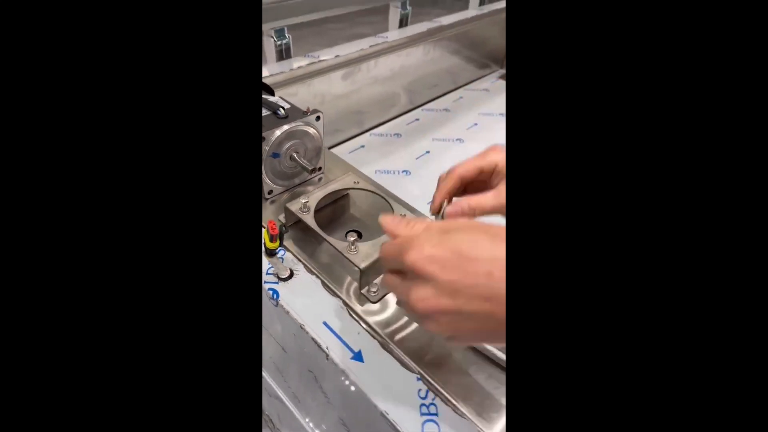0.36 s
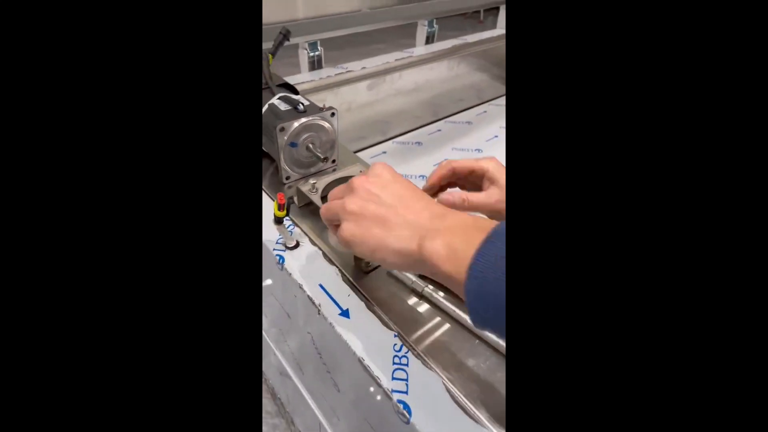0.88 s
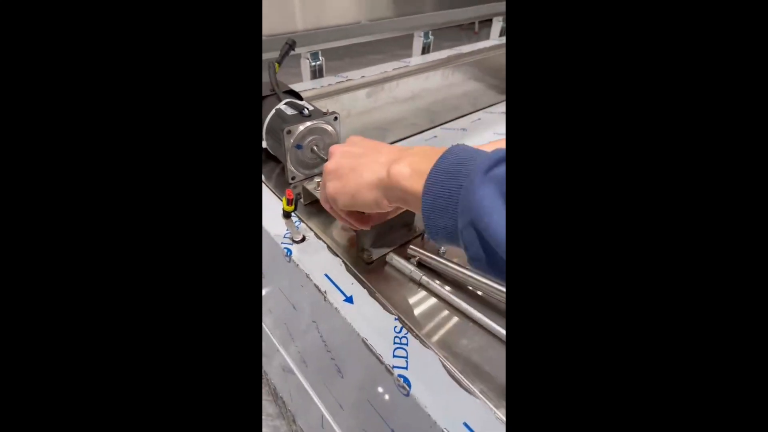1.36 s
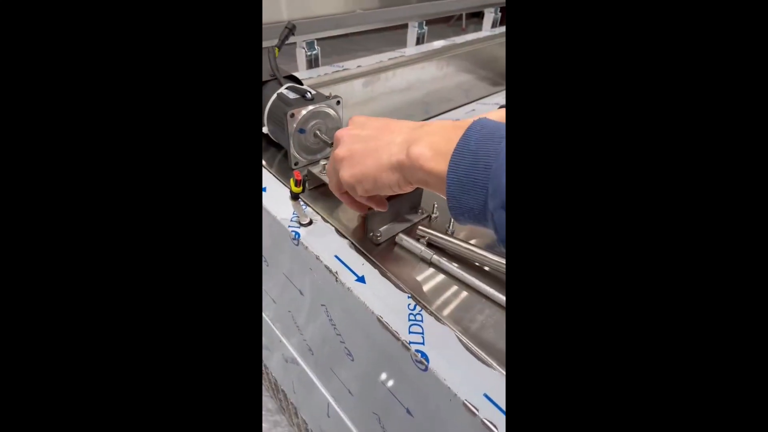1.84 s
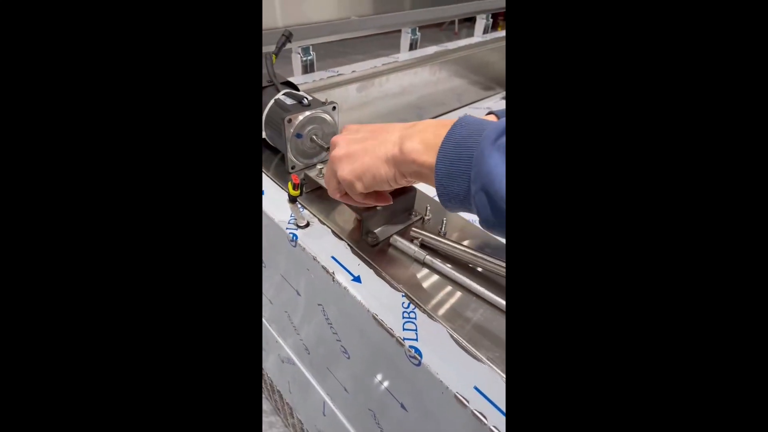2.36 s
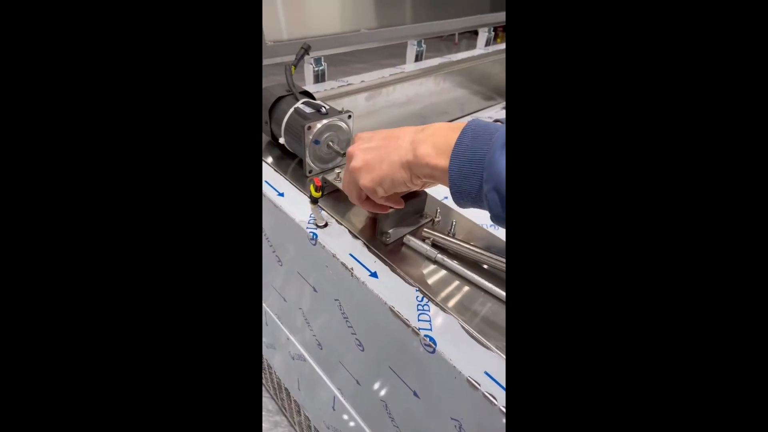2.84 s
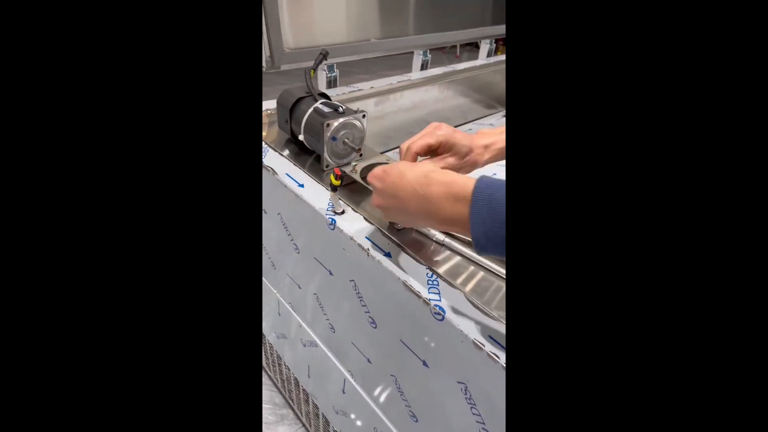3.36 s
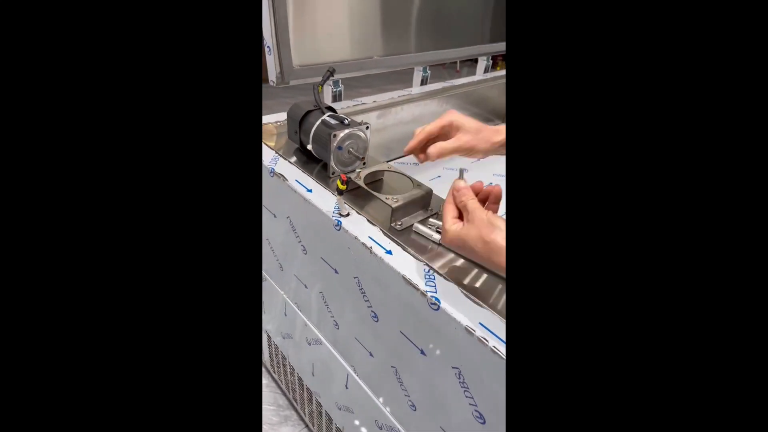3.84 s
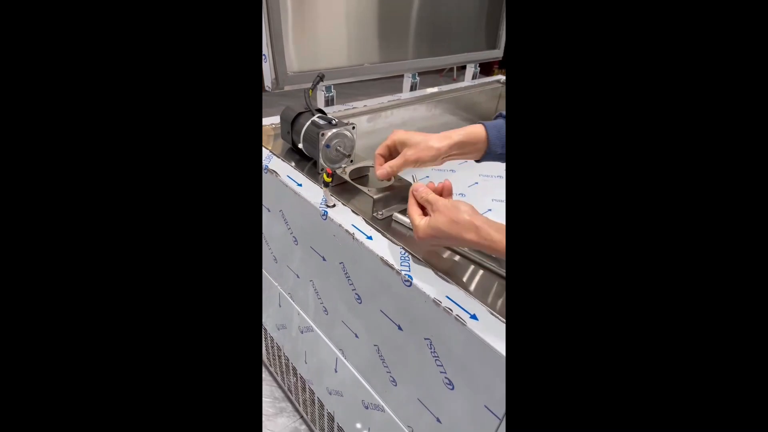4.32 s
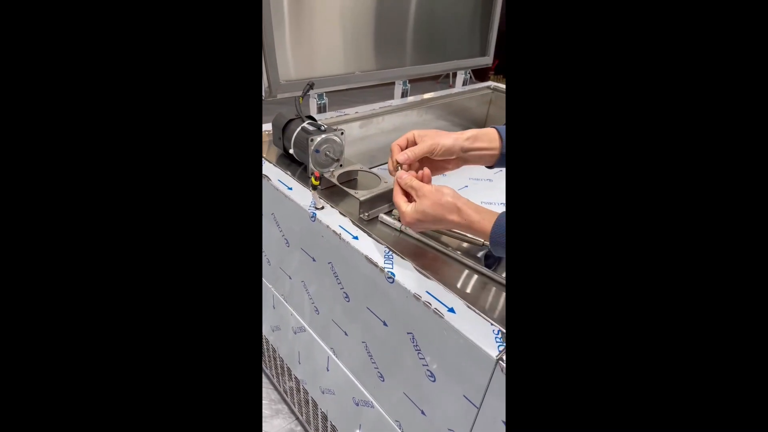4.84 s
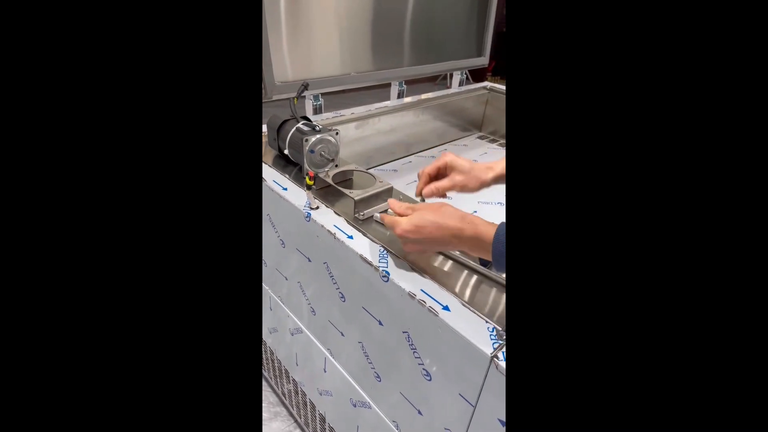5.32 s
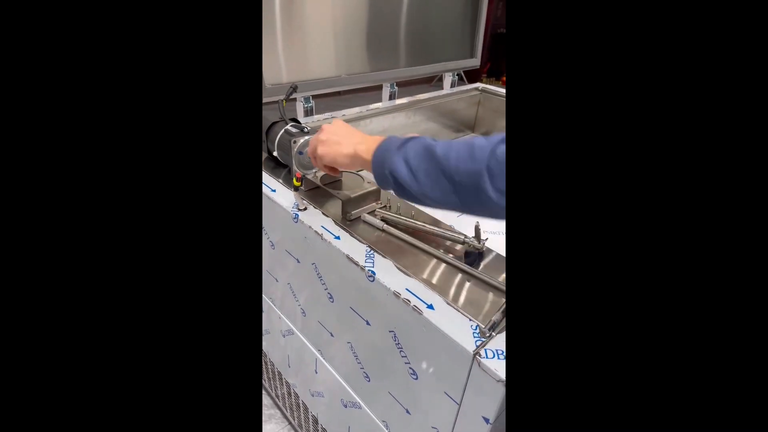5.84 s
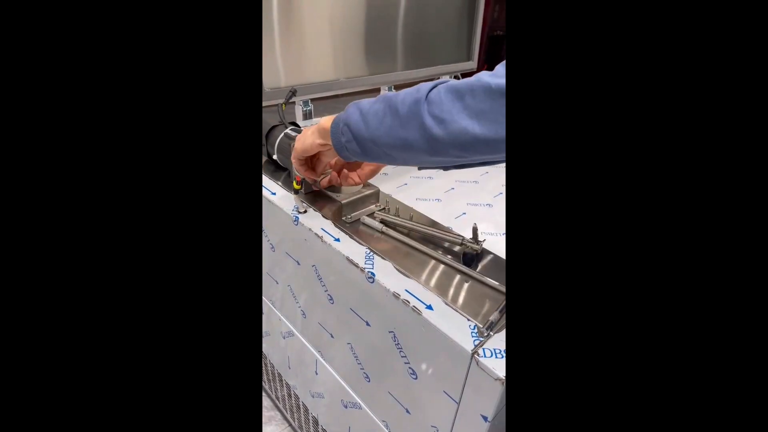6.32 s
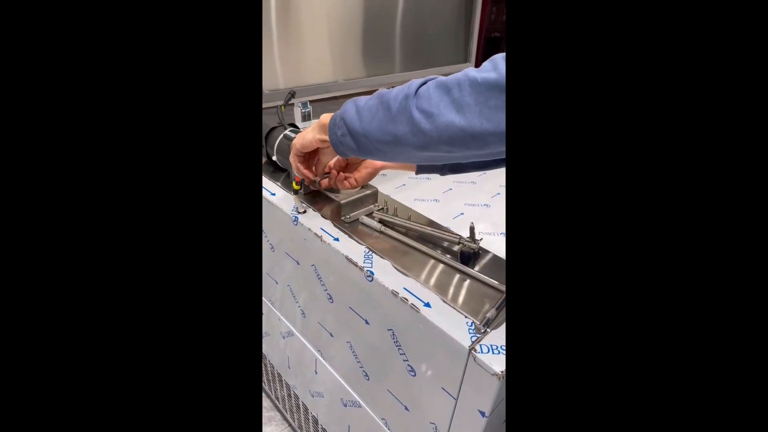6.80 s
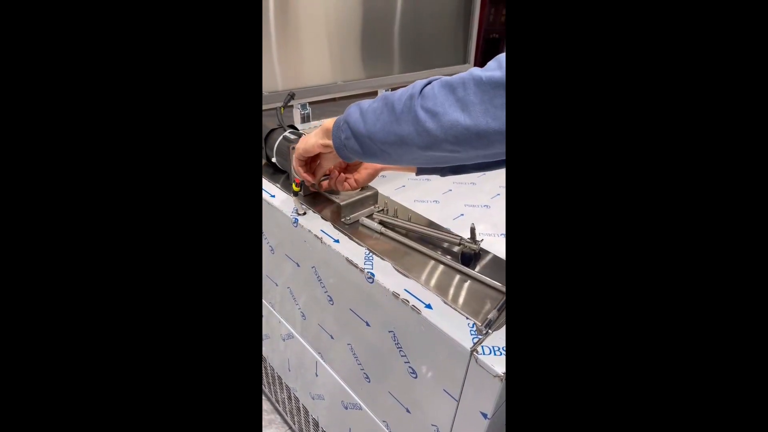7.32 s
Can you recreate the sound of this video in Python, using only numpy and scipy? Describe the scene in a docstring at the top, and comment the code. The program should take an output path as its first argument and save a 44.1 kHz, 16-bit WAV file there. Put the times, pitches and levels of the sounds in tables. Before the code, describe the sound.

Close, dry steel knocks and tiny bright clinks stand out against a large hall's low motor hum and swelling far clatter. Two loud bangs, one near the start and one after five seconds, ring away for over a second. Between them come soft taps, faint drones, a thin high whistle and even air hisses; long air blasts and quick knocks end it. Phone microphone, slightly thinned background.

```python
"""Metal workshop

A machine slide bangs against its stop, lighter knocks and taps land on steel and small parts clink in the hands.
Each blow is a set of dying modes with bursts of noise. Compressed air is gated hiss, with a breathy piping in one
blast; drones and a thin whistle come and go. Behind them lie far clatter (flickering noise with faint rings) and a
low rumble with motor hums. The hall rings for more than a second, and a phone's microphone hears it all."""
import sys
import numpy as np
from scipy import signal
from scipy.fft import rfft, irfft
from scipy.io import wavfile
from scipy.ndimage import uniform_filter1d, map_coordinates

SR = 44100
rng = np.random.default_rng(int(sys.argv[2]) if len(sys.argv) > 2 else 0)


def materialize(psi):
    """Save the field psi as 16-bit PCM at rate SR to the path in sys.argv[1].

    A 1-D psi becomes a single channel; in a 2-D psi each row is a channel.
    """
    bounded = np.clip(np.atleast_2d(psi).T, -1, 1)
    quanta = np.round(bounded * 32767).astype(np.int16)
    wavfile.write(sys.argv[1], SR, quanta)


def convert_level_to_amplitude(level_db):
    """Map a level in decibels to its linear amplitude factor."""
    exponent = np.asarray(level_db, float) / 20
    return 10 ** exponent


N = 338688


def noise(colour):
    """Noise of rms 1 with the given spectrum, drawn straight between points on a log frequency axis."""
    hz, db = np.transpose(colour)
    bins = np.maximum(np.fft.rfftfreq(N, 1 / SR), 1)
    gain = convert_level_to_amplitude(np.interp(np.log(bins), np.log(hz), db))
    x = irfft(rfft(rng.standard_normal(N)) * gain, N)
    return x / x.std()


def narrow_noise(hz, width_hz):
    """Noise of rms 1 crowded around one pitch, 3 dB down at the edges of its width."""
    w = width_hz
    return noise([(hz - 3 * w, -60), (hz - w / 2, -3), (hz, 0), (hz + w / 2, -3), (hz + 3 * w, -60)])


def band(x, lo_hz, hi_hz):
    """Band-pass."""
    return signal.sosfilt(signal.butter(2, [lo_hz, min(hi_hz, .45 * SR)], "bandpass", fs=SR, output="sos"), x)


def walk(rate):
    """Random levels held 1 / rate s and slewed twice; spread near 1."""
    k = int(SR / rate)
    steps = np.repeat(rng.standard_normal(N // k + 1), k)
    return 1.43 * uniform_filter1d(uniform_filter1d(steps, k), k)[:N]


def curve(rows):
    """Columns of a table at every sample."""
    s, *columns = np.transpose(rows)
    return [np.interp(np.arange(N) / SR, s, c) for c in columns]


def swell(start_s, length_s, rise_s, fall_s):
    """Rises to 1, holds and falls again."""
    t = np.arange(N) / SR - start_s
    return np.clip(np.minimum(t / rise_s, (length_s - t) / fall_s), 0, 1) ** 0.5


def flicker(x, depth_db, rate, tilt_db=0):
    """Each half octave wavers on its own; tilt lifts or drops the treble from 2 kHz up."""
    spectrum = rfft(x)
    place = 2 * np.log2(np.maximum(np.fft.rfftfreq(N, 1 / SR), 1))  # in half octaves
    out = 0
    for k in range(8, 29):
        share = np.cos(np.pi / 2 * np.clip(place - k, -1, 1)) ** 2
        level_db = depth_db * walk(rate) + tilt_db * np.clip((k - 22) / 4, 0, 1)
        out = out + convert_level_to_amplitude(level_db) * irfft(spectrum * share, N)
    return out


def ring(modes, gains_db, seconds):
    """One blow: decaying modes, each struck with its own strength, phase and slight detuning."""
    hz, db, t60 = np.transpose(modes)[:, :, None]
    t = np.arange(int(seconds * SR)) / SR
    detune, strength, phase = rng.standard_normal((3, len(modes), 1))
    waves = np.sin(2 * np.pi * hz * (1 + .004 * detune) * t + 2 * phase)
    decay = np.exp(-np.log(1000) * t / t60)
    return np.sum(convert_level_to_amplitude(db + gains_db + 2 * strength) * waves * decay, axis=0), t


def burst(t, tau_s):
    """A short dying crack with a fairly even spectrum."""
    spectrum = rfft(rng.standard_normal(len(t)) * np.exp(-t / tau_s))
    x = irfft(spectrum / np.abs(spectrum), len(t)) * np.exp(-t / (2 * tau_s))
    return x * np.sqrt(tau_s * SR / 2 / np.sum(x ** 2))


def add(out, s, x, peak_db):
    """Place a sound at a moment, its smoothed envelope peaking at peak_db."""
    i = int(s * SR)
    crest = np.sqrt(2 * uniform_filter1d(x ** 2, size=SR // 200).max())
    out[i:i + len(x)] += (convert_level_to_amplitude(peak_db) * x / crest)[:N - i]


def knocks():
    """Steel modes, a broad rattle of the many unlisted modes, a thud and a snap; soft contact rises and dies slower."""
    # blows: (time [s], peak [dB], thud [dB], softness [1 = hard contact], rattle centre [Hz])
    blows = [(0.523, -9.5, -10.5, 1, 2000), (0.5383, -27, -7, 0.56, 1290), (0.5461, -25, -8, 0.97, 990),
             (0.683, -42, -18, 1.3, 1490), (0.861, -33, -11, 4.5, 1140), (0.880, -41, -8, 1.9, 1120),
             (1.196, -33, -9, 4.1, 1830), (1.221, -37, -10, 2.5, 1300), (1.454, -39.5, -6, 2.6, 1150),
             (1.561, -30.5, -11, 1.7, 1260), (1.578, -36.5, -18, 3.3, 1290), (1.855, -39, -6, 3.9, 850),
             (3.114, -41, -10, 2, 1190), (3.189, -40.5, -27, 5.4, 554), (5.401, -10, 0, 1.16, 2000),
             (5.4166, -18, -2, 1.2, 1760), (6.323, -36.5, -27, 5.2, 1310), (7.344, -27, -11, 1.4, 1490),
             (7.358, -33, -8, 2, 1500), (7.371, -34, -12, 1.4, 1100), (7.40, -43, -7, 2.5, 520),
             (7.482, -37, -11, 3, 720), (3.128, -39, -13, 3.6, 1150)]
    # modes of the steel: (frequency [Hz], level [dB], t60 [s])
    steel = [(226, -9, .24), (298, -8, .26), (316, -10, .2), (395, -13, .1), (441, -11, .16),
             (550, -12, .12), (651, -15, .07), (721, -15, .08), (845, -11, .08), (895, -14, .1),
             (960, -11, .06), (1039, -9, .05), (1145, -10, .055), (1297, -10, .05), (1480, -11, .04),
             (1595, -11, .04), (1820, -8, .045), (1911, -8, .04), (2153, -7, .04), (2487, -7, .04),
             (2842, -14, .035), (3074, -16, .03), (4032, -16, .03), (4963, -10, .025), (5421, -5, .03),
             (6078, -9, .025)]
    hard_blow_db = -7.5
    thud_rise_s = 0.0079  # the frame answers late
    out, hz = np.zeros(N), np.array(steel)[:, :1]
    for s, peak_db, thud_db, soft, centre_hz in blows:
        soft = np.clip(soft, .5, 4)
        light_db = hard_blow_db - peak_db
        # lighter blows snap and rattle less, ring nearer their own pitch and spread their rattle wider
        snap_db = 1.5 - 5.5 * light_db
        rattle_db = -0.8 * light_db
        focus = 2.5 + 0.5 * light_db  # dB per octave
        spread = 2 ** (1.96 * np.exp(0.14 * light_db))
        # the struck spot favours modes near its own pitch; the frame below answers with the thud
        spot_db = 3 - focus * np.abs(np.log2(hz / centre_hz))
        body, t = ring(steel, np.where(hz < 500, -99, spot_db), .4)
        late = 1 - np.exp(-t / thud_rise_s)
        frame = late * ring(steel, np.where(hz < 500, thud_db - 0.5, -99), .4)[0]
        rattle = band(band(rng.standard_normal(len(t)), centre_hz / spread, centre_hz * spread), 560, 2800)
        rattle = 2.9 * convert_level_to_amplitude(rattle_db) * rattle * np.exp(-t / (0.012 * soft))
        thud = band(rng.standard_normal(len(t)), 170, 360)
        thud = 2.35 * convert_level_to_amplitude(thud_db) * late * thud * np.exp(-t / 0.047)
        snap = 2.6 * convert_level_to_amplitude(snap_db) * band(burst(t, 0.0038 * soft), 3000, 12800)
        rise = 1 - np.exp(-t / (.0006 * soft ** 2))
        add(out, s, (body + frame + rattle + thud + snap) * rise, peak_db)
    return out


def taps():
    """A dragging contact on a thin steel fitting: a short burst of grit drives its few modes."""
    # contacts: (time [s], peak [dB], rise [s])
    contacts = [(0.715, -35, 0.0038), (0.918, -34, 0.0046), (1.026, -37.5, 0.0034), (1.199, -35, .004),
                (1.230, -38, 0.0058), (1.533, -39, 0.0076), (3.115, -36.5, 0.0034), (3.168, -42, 0.0054),
                (3.19, -44, .004), (6.176, -43.5, 0.0076), (6.322, -37, 0.0057), (6.685, -40, 0.0065),
                (7.342, -34.5, 0.0022), (7.379, -42, 0.0042), (7.387, -37, .004), (7.432, -39, .004),
                (7.447, -36, 0.0033)]
    # modes of the fitting: (frequency [Hz], level [dB], t60 [s])
    fitting = [(1140, -6, .06), (1300, -10, .05), (2160, 0, .06), (2300, -3, .05), (2490, 0, .05),
               (2630, -5, .04)]
    out = np.zeros(N)
    for s, peak_db, rise_s in contacts:
        body, t = ring(fitting, 0, .15)
        grit = rng.standard_normal(len(t)) ** 3 * (t / rise_s) * np.exp(-2 * t / rise_s)
        add(out, s, signal.fftconvolve(body, grit)[:len(t)], peak_db)
    return out


def clinks():
    """Short high rings of small parts over a dry, rattling tick; quieter touches rise slower."""
    # touches: (time [s], peak [dB], brightness above 8 kHz [dB])
    touches = [(0.0875, -38.5, 10), (0.9188, -39, -5), (1.199, -41, -6), (1.562, -53, 6), (1.8528, -40, -3),
               (3.0694, -42, -8), (3.1136, -28, 0.5), (3.127, -39, 0.1), (3.141, -41, -4), (3.153, -44, -2),
               (3.1677, -39, -2), (3.179, -45, -5), (3.188, -39, -4), (3.7394, -55, 14), (4.111, -50, -13),
               (4.126, -37, 3), (4.134, -46, -8), (4.1486, -44, -19), (4.158, -49, -14), (4.2694, -46, 1),
               (7.343, -33, -12)]
    # modes of a small part: (frequency [Hz], level [dB], t60 [s])
    part = [(2160, -12, .05), (4200, -12, .05), (5400, -8, .03), (6000, -7, .04), (9250, -9, .05),
            (9480, -12, .03), (10250, -8, .035), (11400, -12, .025), (12800, -12, .02)]
    out, high = np.zeros(N), np.array(part)[:, :1] > 8000
    for s, peak_db, bright_db in touches:
        body, t = ring(part, high * bright_db, .15)
        low_tick = band(rng.standard_normal(len(t)), 1100, 7000)
        high_tick = convert_level_to_amplitude(bright_db) * band(rng.standard_normal(len(t)), 8000, 14000)
        tick = 1.2 * (low_tick + high_tick) * (np.exp(-t / .003) + .12 * np.exp(-t / .02))
        rise_s = 0.00046 * convert_level_to_amplitude(-31 - peak_db) ** 0.56
        add(out, s, (body + tick) * (1 - np.exp(-t / rise_s)), peak_db)
    return out


def air():
    """Turbulent jet far across the hall: even hiss; pressure builds, sags, and bleeds off after the valve shuts."""
    # blasts: (valve opens [s], valve shuts [s], level before sag and mix [dB], pressure build-up [s])
    blasts = [(1.9, 2.363, -40, 0.12), (4.483, 5.14, -38.5, 0.088), (6.248, 7.098, -40, 0.1),
              (7.007, 7.365, -39.5, 0.23)]
    # spectrum of the hiss: (frequency [Hz], density [dB])
    hiss_colour = [(300, -39), (600, -3.5), (1200, -5.5), (2500, -1.5), (4000, -1), (6000, 0.5),
                   (7500, -13.5), (9000, 0.5), (10300, 0), (12000, -3.5), (14000, -19)]
    sag_db_per_s, fade_db_per_s = 6, 55  # while open, after shutting
    t, power = np.arange(N) / SR, 0
    for open_s, shut_s, db, build_s in blasts:
        held = np.clip(t, open_s, shut_s) - open_s
        after = np.maximum(t - shut_s, 0)
        level = convert_level_to_amplitude(db - sag_db_per_s * held - fade_db_per_s * after)
        power = power + ((1 - np.exp(-held / build_s)) * level) ** 2
    return np.sqrt(power) * flicker(noise(hiss_colour), 0.3, 9.6)


def piping():
    """A breathy whistle in a long air blast: narrow noise, wavering in level."""
    # spectrum of the breath: (frequency [Hz], density [dB])
    breath_colour = [(3550, -40), (3740, -6), (3790, 0), (3840, -6), (4050, -40)]
    start_s, length_s, level_db, fade_s = 6.45, 0.52, -53.5, 0.08
    level = convert_level_to_amplitude(level_db + 2.5 * walk(40.))
    return level * swell(start_s, length_s, fade_s, fade_s) * noise(breath_colour)


def drones():
    """A drive that drones while loaded: narrow, broken bands of noise over a steady sine core."""
    # loads: (start [s], length [s], frequency [Hz], level [dB], width [Hz], core amplitude against noise rms)
    loads = [(2.1, 0.36, 297, -48.5, 18, 1.4), (2.68, 0.33, 1070, -54.5, 30, .4),
             (4.7, 0.19, 300.2, -46.5, 11, 2.1)]
    out, t = 0, np.arange(N) / SR
    for start_s, length_s, hz, db, width_hz, core in loads:
        tone = narrow_noise(hz, width_hz) + core * np.sin(2 * np.pi * hz * t)
        out = out + convert_level_to_amplitude(db) * swell(start_s, length_s, 0.085, 0.093) * tone
    return out


def whistle():
    """A thin sine that swells, holds and fades, wavering in level and pitch."""
    # notes: (start [s], length [s], centre frequency [Hz], mean level [dB])
    notes = [(4.15, .07, 3052, -57), (4.215, .385, 3052, -54.5)]
    out = 0
    for start_s, length_s, hz, db in notes:
        phase = 2 * np.pi * np.cumsum(hz + 4 * walk(36.0)) / SR
        level = np.sqrt(2) * convert_level_to_amplitude(db + 0.79 * walk(24.18))
        out = out + swell(start_s, length_s, .25 * length_s, .02) * level * np.sin(phase)
    return out


def pings(count):
    """Far metal ringing briefly at scattered pitches; the hall blurs each start."""
    out, t = np.zeros(N), np.arange(int(.2 * SR)) / SR
    for when, pitch, size, length in rng.random((count, 4)):
        tau_s = 0.0058 + 0.033 * length
        wave = np.sin(2 * np.pi * 450 * 14 ** pitch * t) * (t / tau_s) * np.exp(-t / tau_s)
        add(out, when * N / SR, wave, 8 * size - 14 * pitch)
    return out / out.std()


def clatter():
    """Many small far impacts, smeared into flickering noise with faint rings; the swells waver slightly in level."""
    # machinery across the hall, before waver and mix: (time [s], level [dB])
    machinery = [(0.0, -50.5), (0.56, -52), (0.75, -43.5), (1.41, -43), (1.75, -49.5), (2.25, -43),
                 (2.6, -47.5), (3.06, -54.5), (3.55, -55.5), (3.91, -54), (3.96, -50), (4.55, -55),
                 (4.8, -45), (5.35, -52.5), (5.58, -42.5), (5.85, -57), (6.45, -48), (7.25, -41.5),
                 (7.68, -53)]
    # spectrum of the wash: (frequency [Hz], density [dB])
    wash_colour = [(120, 6.5), (300, 2), (900, -1), (1500, -2), (2400, -2.5), (4000, -7.5), (6000, -14.5),
                   (8500, -29), (11000, -20.5), (12200, -32), (13500, -46), (14500, -70)]
    level_db = curve(machinery)[0]
    below_db = -41 - level_db  # distance under the loudest swells
    wash = noise(wash_colour) + convert_level_to_amplitude(-5.5) * pings(count=1200)
    # the waver is full down to 4 dB below and gone at 12 dB below
    waver_db = .8 * np.clip(1.5 - below_db / 8, 0, 1) * walk(21.97)
    tilt_db = 5 + 0.0872 * below_db  # the swells are darker than the lulls
    return convert_level_to_amplitude(level_db + waver_db) * flicker(wash, .8, 14., tilt_db)


def rumble():
    """Ventilation and far machines: a broad low roar with narrow, unsteady motor hums."""
    # spectrum of the roar: (frequency [Hz], density [dB])
    roar_colour = [(15, -22), (30, -13), (60, -6), (100, -2), (200, -11.5), (400, -13), (600, -21.5),
                   (800, -20), (1050, -27), (2500, -41.5), (6000, -44), (10000, -43.5), (14000, -102)]
    # course of roar and hums together: (time [s], level [dB])
    course = [(0.0, -45), (0.6, -43), (1.25, -46), (2.2, -42), (2.9, -43.5), (4.3, -42.5), (5.1, -45.5),
              (5.55, -40.5), (6.05, -44), (6.5, -42.5), (6.95, -45.5), (7.68, -41.5)]
    # wavering motor hums: (frequency [Hz], width [Hz], level against the course [dB])
    motors = [(64.8, 5.9, -9.5), (96.7, 9, -8.5), (125, 8.9, -23), (146.8, 3.15, -7.5), (219.3, 8.1, -24)]
    hums = sum(convert_level_to_amplitude(db) * narrow_noise(hz, width_hz) for hz, width_hz, db in motors)
    roar = convert_level_to_amplitude(0.5) * flicker(noise(roar_colour), 1.0, 3.35)
    return convert_level_to_amplitude(curve(course)[0]) * (roar + hums)


def hall(x):
    """Diffuse tail: noise with its own decay in each octave, building up over the first reflections."""
    # decay of the hall: (frequency [Hz], t60 [s])
    decays = [(100, 2.7), (1000, 1.27), (4000, 1.5), (13000, 0.74)]
    level_db, tilt_db = -12, 0.4  # level of the whole tail; lift per octave
    t = np.arange(int(1.5 * SR)) / SR
    hz, t60 = np.transpose(decays)
    tail = 0
    for f in 80 * 2. ** np.arange(8):
        octave = band(rng.standard_normal(len(t)), f, 2 * f) * convert_level_to_amplitude(tilt_db * np.log2(f / 1280))
        octave_t60 = np.interp(np.log(np.sqrt(2) * f), np.log(hz), t60)
        tail = tail + octave * np.exp(-np.log(1000) * t / octave_t60)
    tail *= 1 - np.exp(-t / 0.003)
    return convert_level_to_amplitude(level_db) * signal.fftconvolve(x, tail / np.sqrt(np.sum(tail ** 2)))[:N]


def thin_bands(x):
    """Processing artefact, no sound of the workshop: random gains waver narrow bands and briefly thin some out."""
    cell_hz, cell_s = 130, .045  # spacing of the random gains
    waver_db, hole_db = 2.5, 30  # spread of the gains; steepness of the rare holes
    hz, t, z = signal.stft(x, SR, nperseg=1024)
    cells = rng.standard_normal((int(hz[-1] / cell_hz) + 2, int(t[-1] / cell_s) + 2))
    field = map_coordinates(cells, np.meshgrid(hz / cell_hz, t / cell_s, indexing="ij"), order=1)
    share = np.interp(hz, [600, 2200, 4800, 6500, 10000], [0, 1, 1, .4, .2])[:, None]  # mostly the mids
    gain = convert_level_to_amplitude(share * (waver_db * field - hole_db * np.clip(-1.1 - field, 0, .6)))
    return signal.istft(z * gain / np.sqrt(np.mean(gain ** 2)), SR, nperseg=1024)[1][:N]


def scene():
    """One microphone, sent to both ears; only the background has its bands thinned by processing."""
    blows = knocks() + taps() + clinks()
    tones = drones() + whistle() + piping()
    background = rumble() + convert_level_to_amplitude(0.6) * (air() + clatter()) + hall(blows)
    mono = thin_bands(background) + tones + blows
    return np.array([mono, mono])


def roll_off(x):
    """The treble ends steeply here."""
    return signal.sosfilt(signal.butter(12, 14250, fs=SR, output="sos"), x)


def record(dry):
    """The phone rounds the loudest peaks, dips near 3 and 8 kHz, drops a narrow treble band and cuts the top."""
    gap_hz = 7180, 8250
    rounded = .62 * np.tanh(dry / .62)
    rounded = rounded - 0.15 * band(rounded, 2350, 3400)
    rounded = rounded - 0.55 * band(rounded, 7300, 9300)
    gap = signal.ellip(5, .5, 45, gap_hz, "bandstop", fs=SR, output="sos")
    top = signal.ellip(12, .1, 70, 13950, fs=SR, output="sos")
    # the dropped band comes through faintly during sudden clicks
    inside = band(band(rounded, *gap_hz), *gap_hz)
    jump = uniform_filter1d(inside ** 2, size=400) / (uniform_filter1d(inside ** 2, size=8000) + 1e-18)
    clicks = convert_level_to_amplitude(-10.5) * np.clip(jump / 2 - 1, 0, 1) * inside
    mix = signal.sosfilt(top, signal.sosfilt(gap, rounded) + clicks)
    return roll_off(mix)


dry = scene()
out = record(dry)
materialize(out)
```